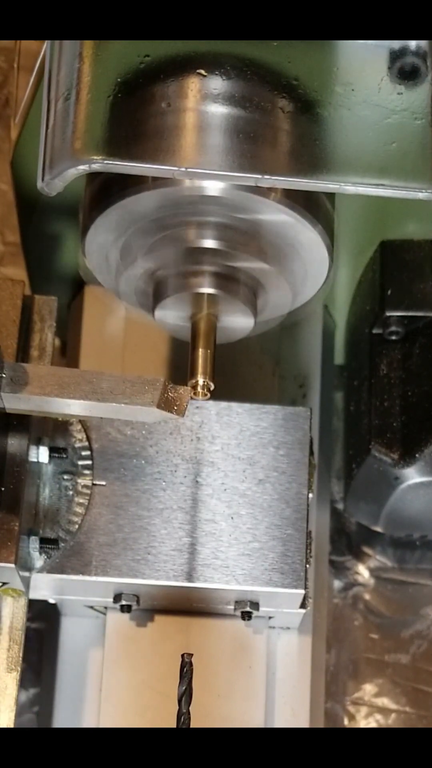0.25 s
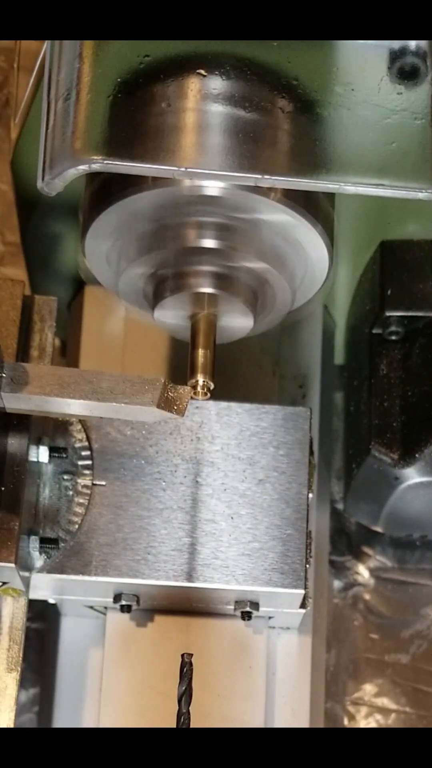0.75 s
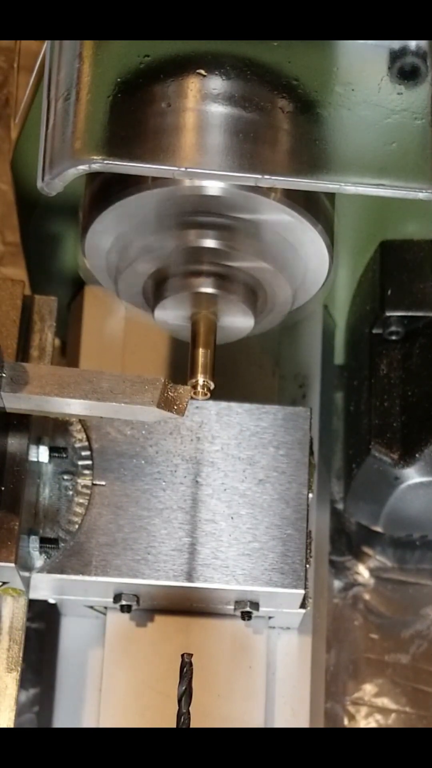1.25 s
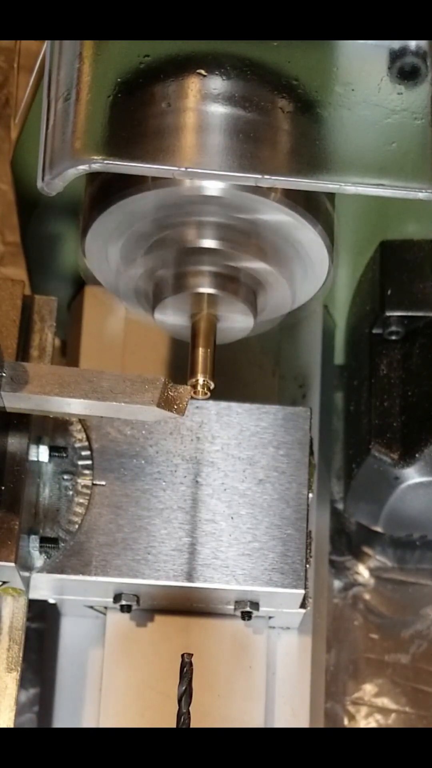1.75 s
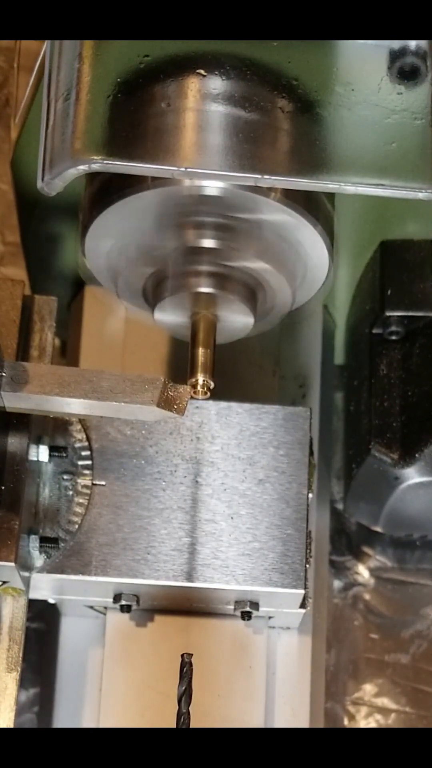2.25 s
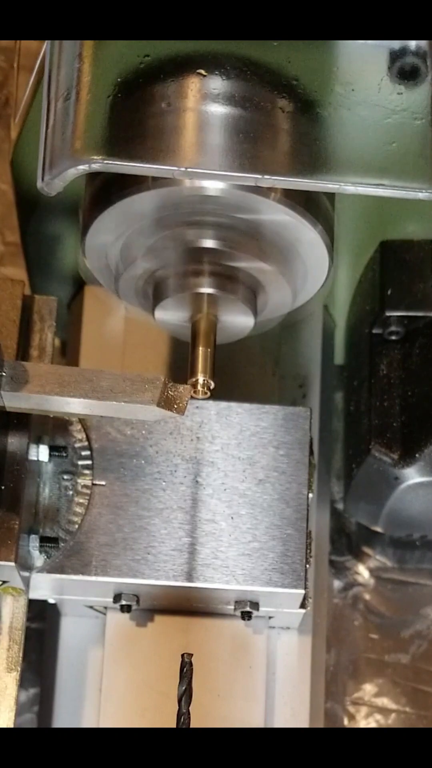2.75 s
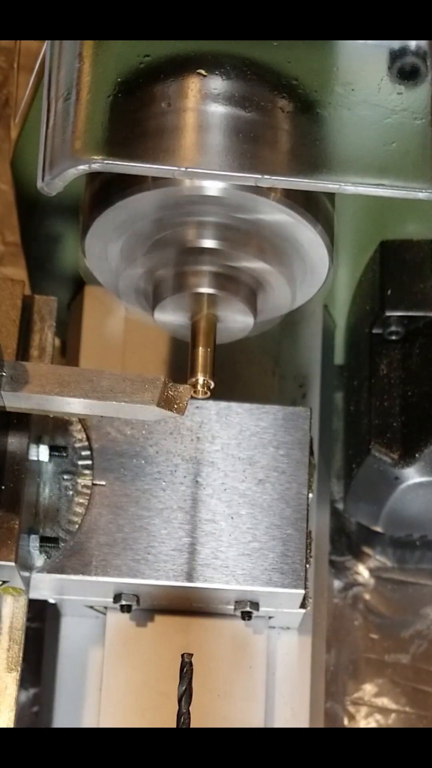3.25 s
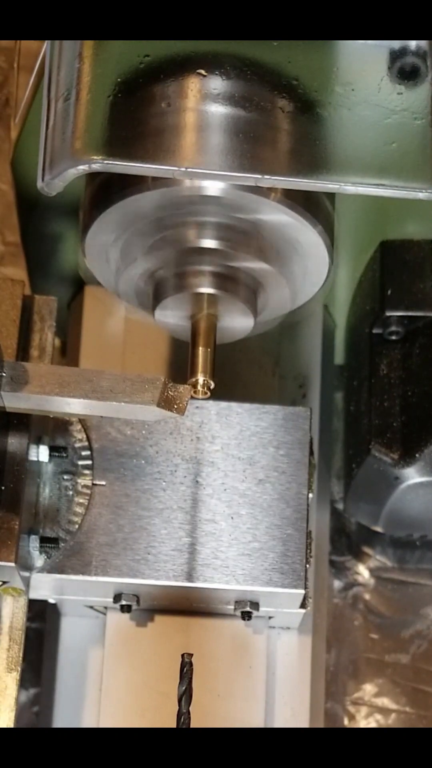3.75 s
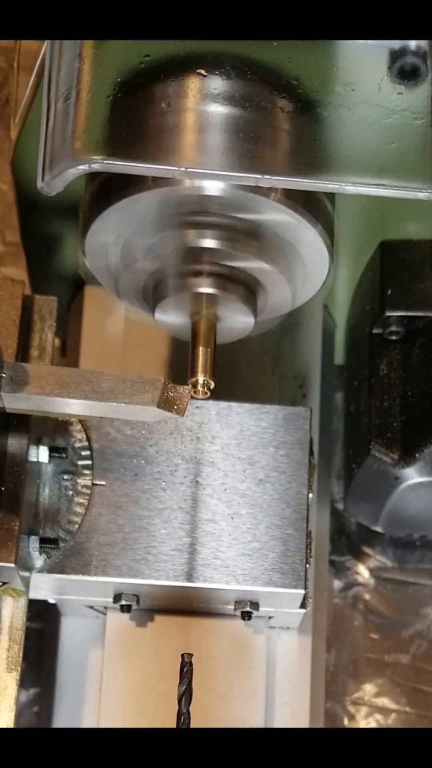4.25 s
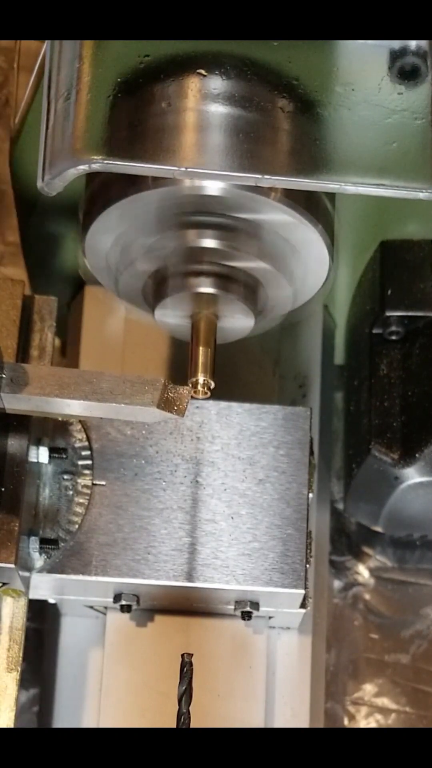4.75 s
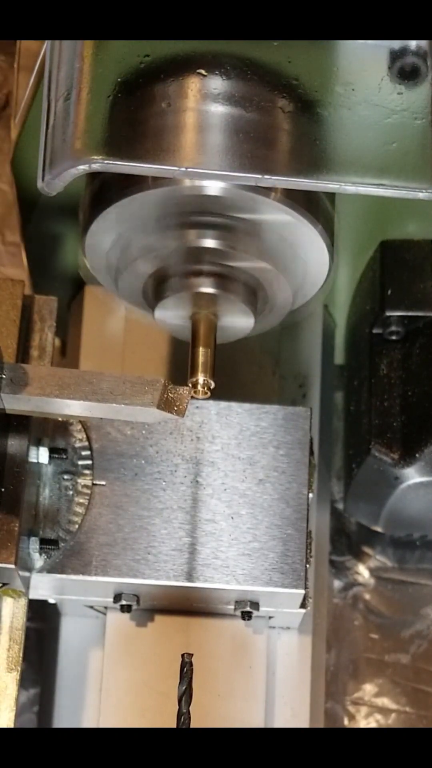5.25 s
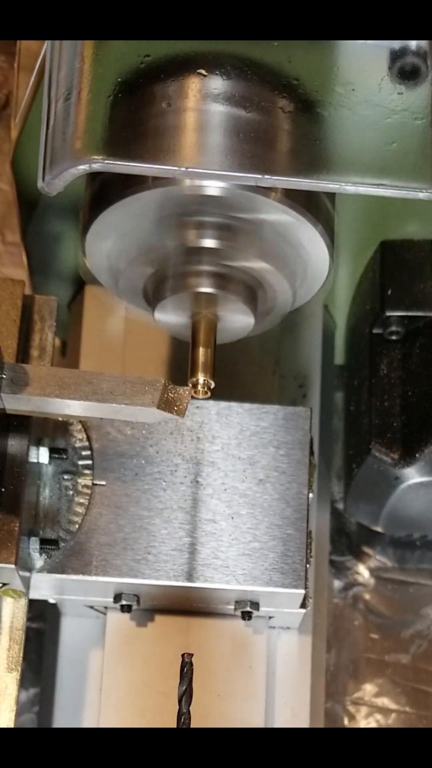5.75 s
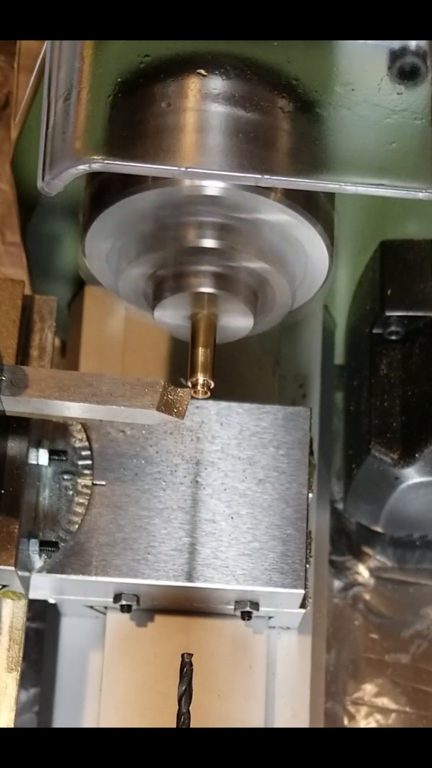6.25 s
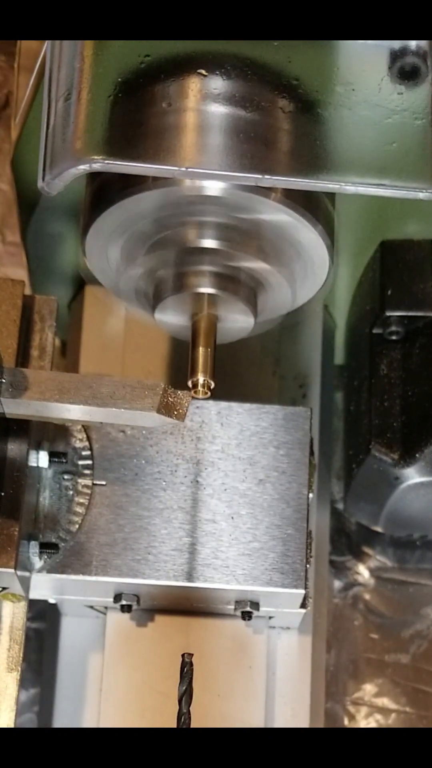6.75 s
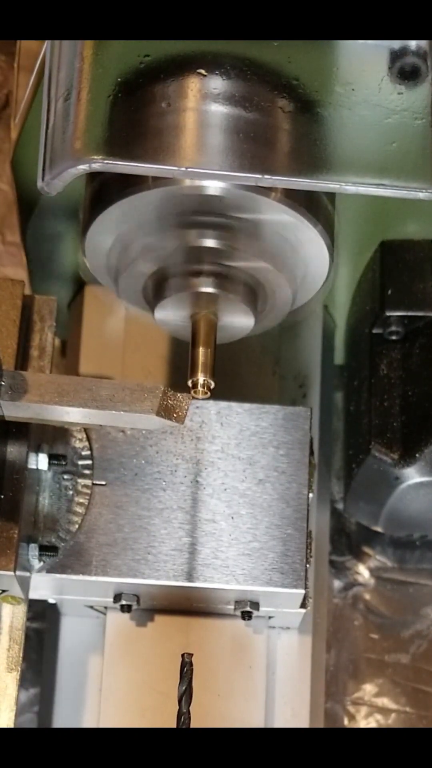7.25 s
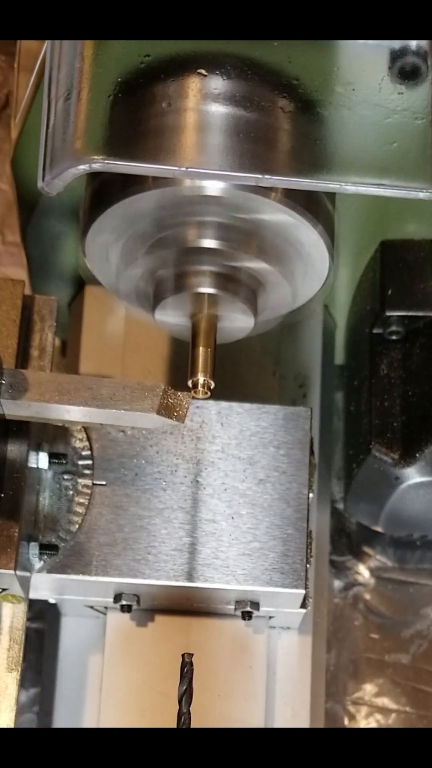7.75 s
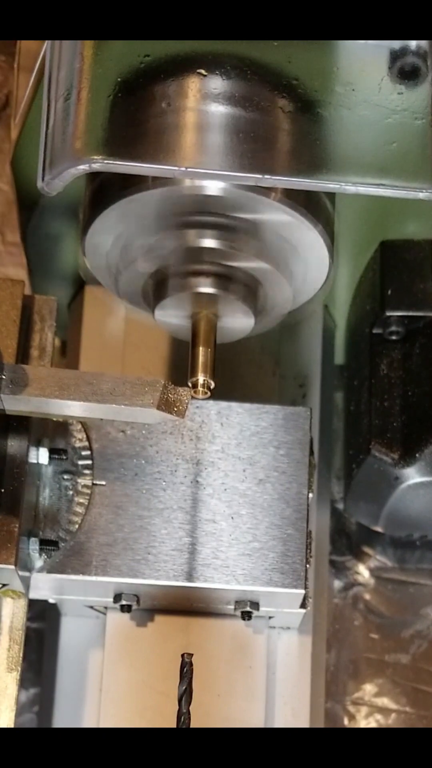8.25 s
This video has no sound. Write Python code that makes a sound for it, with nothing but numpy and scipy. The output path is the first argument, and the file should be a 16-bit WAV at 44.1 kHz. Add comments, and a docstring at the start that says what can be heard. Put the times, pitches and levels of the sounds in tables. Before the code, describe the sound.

A small lathe whines steadily while its tool cuts a thin brass rod in quick, uneven, high squeaks that gradually thin out.

```python
"""A thin brass rod squeaks in quick, uneven chirps over the whine of a small lathe. Where the tool grabs,
the rod chatters on a low mode that hands over to a higher one. The drive whines on its tooth rate over
a rough mains hum and the roar and hiss of bearings; the cut rasps once a turn and shakes the bed.
Later the squeaks thin out, chips tear off, and the tool backs off for about a second.
Heard close by two microphones a few centimetres apart."""
import sys
import numpy as np
from scipy import signal
from scipy.fft import rfft, irfft, next_fast_len
from scipy.io import wavfile
from scipy.ndimage import uniform_filter1d

SR = 44100
rng = np.random.default_rng(int(sys.argv[2]) if len(sys.argv) > 2 else 0)


def to_wav(s):
    """Save 16-bit WAV."""
    ch = np.atleast_2d(s).T  # columns
    pcm = np.round(np.clip(ch, -1, 1) * 32767)  # PCM
    wavfile.write(sys.argv[1], SR, pcm.astype(np.int16))


N = 374838
TIME_S = np.arange(N) / SR
FFT_SIZE = next_fast_len(N)
BIN_HZ = np.maximum(np.arange(FFT_SIZE // 2 + 1) * SR / FFT_SIZE, 1)
TEETH_PER_SHAFT_TURN, TEETH_PER_SPINDLE_TURN = 22, 50
RIGHT_LAG_SAMPLES = 8.14   # the right microphone is farther away


def amp(db):
    return 10 ** (np.asarray(db) / 20)


def unit_rms(x):
    return x / np.sqrt(np.mean(x ** 2) + 1e-20)


def time_curves(rows):
    """One curve for each column after the first, which is time in seconds."""
    times_s, *columns = np.transpose(rows)
    return [np.interp(TIME_S, times_s, column) for column in columns]


def bin_curve(rows):
    """(Hz, value) rows interpolated over the FFT bins in log frequency."""
    hz, values = np.transpose(rows)
    return np.interp(np.log(BIN_HZ), np.log(hz), values)


def drift(rate_hz):
    """Slow random curve of spread 1."""
    pole = np.exp(-40 * np.pi * rate_hz / SR)
    slow = signal.lfilter([1], [1, -2 * pole, pole * pole], rng.standard_normal(N // 20 + 4002))[4000:]
    return np.interp(np.arange(N) / 20, np.arange(len(slow)), unit_rms(slow - slow.mean()))


def resonate(x, modes):
    """Parallel resonances (Hz, width Hz, gain dB), signs alternating."""
    out = 0
    for k, (hz, width_hz, db) in enumerate(modes):
        r = np.exp(-np.pi * width_hz / SR)
        b = (1 - r * r) / 2 * np.array([1, 0, -1])
        a = [1, -2 * r * np.cos(2 * np.pi * hz / SR), r * r]
        out = out + (-1) ** k * amp(db) * signal.lfilter(b, a, x)
    return out


def resonate_twice(x, modes):
    return resonate(resonate(x, modes), modes)


def mix_in(out, at, piece):
    start, end = max(at, 0), min(at + piece.shape[-1], N)
    out[:, start:end] += piece[:, start - at:end - at]


def microphone_pair(mid, side):
    """Two noises become a partly coherent stereo pair, right late; its mono mean has rms 1."""
    # Each row: frequency in Hz, left-right coherence 0-1.
    coherence = [(25, 0.5), (60, 1), (250, 0.95), (600, 0.78), (1300, 0.4), (1700, 0.74), (2300, 0.55),
                 (3000, 0.16), (4100, 0.76), (5000, 0.35), (6500, 0.57), (10500, 0.2), (15000, 0.2)]
    # Each row: frequency in Hz, left over right in dB.
    balance = [(60, 7.5), (130, -3), (290, 8), (640, 2), (1410, 2.5), (3100, 1), (6820, -0.5), (15000, -2)]
    # Each row: frequency in Hz, extra phase on the right in rad.
    right_phase = [(1000, 0), (1400, .7), (1700, 0.7), (2100, -1.5), (2400, 0.24), (2800, -2.5), (3200, -2),
                   (3800, -0.37), (4100, 0), (5000, 0), (5900, 3.5), (7100, 3.8), (8000, 3), (11400, 3.5),
                   (15000, 6)]
    alike = bin_curve(coherence)
    common = np.sqrt(1 + alike) * rfft(mid, FFT_SIZE)
    apart = np.sqrt(1 - alike) * rfft(side, FFT_SIZE)
    tilt = amp(bin_curve(balance) / 2)
    delay = np.exp(-2j * np.pi * BIN_HZ * RIGHT_LAG_SAMPLES / SR + 1j * bin_curve(right_phase))
    pair = irfft(np.array([(common + apart) * tilt, (common - apart) / tilt * delay]), FFT_SIZE)[:, :N]
    return pair / np.sqrt(np.mean(pair.mean(axis=0) ** 2))


def drive_whine(tooth_rad, tooth_hz, swell_db, unevenness, lifted):
    """Tooth-rate harmonics; uneven teeth blur them, run-out adds sidebands at the shaft rate."""
    # Multiples of the tooth rate, one for each row of harmonics.
    multiples = [1, 2, 3, 4, 5, 7, 8, 9, 10, 11, 12, 13]
    # Each row: base level in dB, share of the swell, dB per Hz of tooth rate, left over right in dB,
    # left lead in rad, run-out depth, blur per unit of unevenness.
    harmonics = [(-39.5, 0.72, 0.13, 5.5, 0.5, 0.14, 0.02), (-54.5, 1.8, 0.82, 5, 2, 0.33, 0.1),
                 (-48.5, 1.07, 0.18, -2.5, 1.16, 0.37, 0.16), (-51.5, 0.33, 0.02, 2.5, -1.5, 0.12, 0.13),
                 (-52.5, 0.29, 0.17, -21, 3, 0.29, 0.12), (-57.5, 0.49, 0.09, 0, 2.5, 0.21, 1),
                 (-60, 0.17, 0.08, -2, 7, 0.12, 0.37), (-56.5, 0.26, 0.2, 13, 1, 0.24, 0.5),
                 (-49, 0.095, -0.04, -5, -0.8, 0.09, 0.27), (-55.5, 0.42, 0.22, 9, 2, .3, .6),
                 (-65, 0.6, -0.3, -2, 15, .3, .9), (-54, 0.2, 0.4, 0, 5.5, .3, .8)]
    # Rectifier ripple side tones. Each row: offset in Hz, level against the fundamental in dB.
    side_tones = [(120.5, -19), (241, -19), (-241, -29.5)]
    # Second harmonic. Each row: time in seconds, gain in dB.
    octave_gain = [(0, -4), (3, -4), (3.6, 4), (4.4, -5), (5, 0.5), (5.7, -2.5), (6.2, 1.5), (6.7, 2.5),
                   (7.6, -2.5), (8.5, 2.5)]
    steady_hz, firmness = 1110, 0.58
    octave_db, = time_curves(octave_gain)
    shaft_rad = tooth_rad / TEETH_PER_SHAFT_TURN
    wander_rad = 0.014 * unevenness * drift(11.6) + 0.29 * drift(7.2)
    ripple = 1 + sum(amp(db) * np.exp(2j * np.pi * hz * TIME_S + 0.74j * drift(14))
                     for hz, db in side_tones)
    out = np.zeros((2, N))
    for k, (db, share, db_per_hz, pan_db, lead_rad, runout, blur) in zip(multiples, harmonics):
        blur = np.clip(blur * unevenness + 0.039 * (k - 1), 0, 0.95)
        runout = runout * (1 + 0.41 * lifted)
        shared, own = [(drift(22 + 10 * k) + 1j * drift(22 + 4.6 * k)) / np.sqrt(2) for _ in range(2)]
        tone = np.sqrt(1 - blur ** 2) + blur * np.array([shared, 0.83 * shared + 0.72 * own])
        tone /= (np.abs(tone) + 0.099) ** firmness   # evens the level, keeps the phase jitter
        wobble_rad = 0.81 * runout * np.sin(shaft_rad + k + 1.4 * (k - 1))
        tone *= np.exp(1j * (k * tooth_rad + np.sqrt(k) * wander_rad + wobble_rad))
        if k == 1:
            tone *= ripple
        level_db = db + share * swell_db + db_per_hz * (tooth_hz - steady_hz)
        level_db += (k > 1) * drift(4.8) + (k == 2) * octave_db
        envelope = np.sqrt(2) * amp(level_db) * (1 + runout * np.cos(shaft_rad + k))
        left = amp(pan_db / 2) * np.exp(0.5j * lead_rad)
        sides = np.array([[left], [1 / left]])
        out += envelope / max(abs(sides.mean()), 0.5) * np.real(tone * sides)
    return out


def mains_hum():
    """Rectifier pulses shake the motor; at random the lowest tone skips: it dips and loses phase."""
    # Each row: frequency in Hz, relative level in dB.
    tones = [(120, 0), (241, -6), (359, -13.5), (484, -16.5), (1332, -14.5)]
    # Each row: time in seconds, mean skips per second.
    skip_rates = [(0, 8), (2.3, 7), (2.45, 1), (2.9, 1), (3.1, 8), (3.5, 3), (3.6, .3), (4.05, .3),
                  (4.2, 9), (4.9, 16), (5.0, .3), (5.4, .3), (5.8, 11), (6.3, 6), (7, 17), (7.9, 19),
                  (8.5, 10)]
    skip_turns = 0.46
    skips = rng.random(N) < time_curves(skip_rates)[0] / SR
    skipping = np.exp(-2j * np.pi * skip_turns * np.cumsum(skips))
    skipping = signal.oaconvolve(skipping, np.hanning(900) / 450, "same")
    skipping /= (np.abs(skipping) + 0.046) ** 0.47
    out = 0
    for k, (hz, db) in enumerate(tones):
        waver = skipping if k == 0 else np.exp(0.68j * drift(20))
        envelope = amp(db + (0.4 + 0.9 * k) * drift(14))
        out = out + envelope * np.real(waver * np.exp(2j * np.pi * hz * TIME_S))
    return unit_rms(out)


def shaft_noise(tooth_rad, spectrum, locked_share, flicker_db):
    """Shaped noise; a share repeats with every shaft turn and forms a comb of lines."""
    steps = 880
    pattern = rng.standard_normal((2, steps))
    pattern -= uniform_filter1d(pattern, size=60, mode="wrap")   # the lowest orders do not radiate
    turns = tooth_rad / TEETH_PER_SHAFT_TURN / (2 * np.pi) + 0.0014 * drift(4.6)
    locked = pattern[:, (turns % 1 * steps).astype(int) % steps]
    noise = np.sqrt(1 - locked_share) * rng.standard_normal((2, N)) + np.sqrt(locked_share) * locked
    noise *= amp(flicker_db * (drift(53) + 0.081 * drift(4.6)))
    shaped = irfft(rfft(noise, FFT_SIZE) * amp(bin_curve(spectrum)), FFT_SIZE)[:, :N]
    return microphone_pair(*shaped)


def bearings(tooth_rad, swell_db, uneven_db):
    """Bearings and fan roar and hiss, swelling with the overall level."""
    # Each row of both spectra: frequency in Hz, relative density in dB.
    roar_spectrum = [(15, -26), (40, -21), (75, -23.5), (120, -10.5), (180, -22.5), (260, -17.5),
                     (340, -25), (430, -24), (520, -18.5), (630, -21.5), (720, -21.5), (900, -20),
                     (1050, -19.5), (1200, -17.5), (1325, -11.5), (1420, -15.5), (1550, -16.5), (1700, -25),
                     (2050, -17), (2350, -14.5), (2650, -18.5), (3000, -23), (3350, -20), (3700, -22),
                     (4300, -26.5), (5400, -18.5), (6200, -24.5), (8000, -72)]
    hiss_spectrum = [(4500, -16.5), (6000, -8), (6900, -1), (7500, -13.5), (8300, -37), (8900, -16.5),
                     (9500, -19), (10300, -7.5), (11000, 2), (11700, -7), (12500, -5), (13000, -12),
                     (13400, -8), (13800, -13), (14150, -3), (14550, -4.5), (15200, -8), (15700, -5.5),
                     (16500, -3)]
    # Low band of the roar. Each row: time in seconds, gain in dB.
    band_gain = [(0, 0.5), (1, -3.5), (1.8, 1), (2.7, -3.5), (3.4, -0.5), (3.9, 0), (5, 0.5), (6, 3),
                 (6.6, 0), (7.2, -0.5), (8.5, -2)]
    roar = shaft_noise(tooth_rad, roar_spectrum, 0.36 / amp(0.5 * np.abs(uneven_db)), flicker_db=1.3)
    roar *= amp(-42 + 0.39 * swell_db)
    band = signal.sosfilt(signal.butter(2, (380, 750), "band", fs=SR, output="sos"), roar)
    roar += (amp(time_curves(band_gain)[0]) - 1) * band
    hiss = shaft_noise(tooth_rad, hiss_spectrum, locked_share=0.43, flicker_db=1.5)
    return roar + amp(-40.5 + 0.57 * swell_db) * hiss


def cutting_rasp(tooth_rad, tool_db, rod_db):
    """Tearing clicks ring tool and rod; the rod runs out of true, so the bite peaks once a turn."""
    # Each row of both: mode frequency in Hz, width in Hz, gain per pass in dB.
    tool_modes = [(2468, 280, -3), (2720, 232, -2), (2936, 160, -0.5), (3300, 193, -5), (3980, 340, -2.5)]
    rod_modes = [(4170, 360, 4.5), (4730, 69, 8.5), (5300, 2500, -5.5)]
    clicks_per_s = 2500
    spindle_rad = tooth_rad / TEETH_PER_SPINDLE_TURN + 0.8 * drift(3)
    bite = amp(1.5 * (np.cos(spindle_rad) + 0.5 * np.cos(3 * spindle_rad) + 1.64 * drift(36)))
    out = 0
    for modes, level_db in ((tool_modes, tool_db), (rod_modes, rod_db)):
        clicks = (rng.random((2, N)) < clicks_per_s / SR) * rng.standard_normal((2, N))
        clicks *= amp(1.5 * np.minimum(rng.exponential(1, (2, N)), 4))
        out = out + amp(level_db) * microphone_pair(*resonate_twice(clicks * bite, modes))
    return out


def bed_rumble(swell_db):
    """Cutting force shakes the lathe bed; its upper modes sink as the overall level rises."""
    # Each row: mode frequency in Hz, width in Hz, gain per pass in dB.
    bed_modes = [(727.8, 32, 1), (765, 32, 0), (797, 59, -0.5), (838.7, 45, 0)]
    force = rng.standard_normal((2, N))
    lower = resonate_twice(force, bed_modes[:2])
    upper = resonate_twice(force, bed_modes[2:])
    return microphone_pair(*(lower - amp(0.5 - 0.47 * swell_db) * upper))


def rod_squeaks():
    """Chatter grows on the low mode, breaks off and slides to the high one; contact adds harmonics."""
    # Each row: break-off in seconds, low mode level in dB, its base pitch in Hz,
    # high mode level in dB, its hold in ms.
    squeaks = [(0.0038, -14.5, 4140, -20, 7.9), (0.0222, -19.5, 4200, -19.5, 5.8),
               (0.0528, -15, 4120, -18, 4.6), (0.0833, -24, 4170, -33.5, 6.6),
               (0.1013, -15, 4120, -17.5, 4.9), (0.1467, -31, 4200, -29, 5.0),
               (0.1645, -28, 4200, -29.9, 6.2), (0.196, -14.5, 4150, -17, 5),
               (0.2428, -22.5, 4200, -29, 5.3), (0.289, -20.5, 4150, -24, 4.6),
               (0.3292, -33, 4170.0, -45, 5.4), (0.349, -18, 4130, -18.5, 5), (0.3602, -29, 4100, -42, 4.3),
               (0.3697, -21, 4070, -21, 4.1), (0.382, -26, 4120, -41, 5.5), (0.401, -14, 4120, -16, 3.5),
               (0.412, -25, 4230, -32, 4.7), (0.4212, -15.5, 4130, -16.5, 4.1),
               (0.452, -17, 4170.0, -21.8, 4.0), (0.4978, -15, 4100, -13, 2.6),
               (0.5285, -28.3, 4230.0, -31.5, 5.7), (0.544, -25, 4160, -22.5, 6.4),
               (0.577, -15.5, 4130, -23, 6.8), (0.592, -13.5, 4170, -16, 4.6),
               (0.622, -27.5, 4170, -37, 5.0), (0.6374, -30, 4180, -40, 5.0), (0.649, -27, 4270, -27, 7.9),
               (0.68, -31, 4170.0, -35, 5.5), (0.6983, -25, 4190.0, -27, 7.8),
               (0.7495, -29, 4240.0, -28, 8), (0.7805, -28, 4270, -33, 7.3),
               (0.797, -14.5, 4150.0, -17, 4.9), (0.827, -23, 4260, -26, 6.0),
               (0.8387, -27, 4230.0, -29.5, 6.9), (0.859, -30, 4140, -29, 6.4),
               (0.89, -14, 4090, -17.5, 5.9), (0.923, -13.5, 4130, -24, 6.5), (0.936, -19, 4100, -28, 7),
               (0.957, -15, 4080, -15.5, 4.2), (0.988, -23, 4220, -32, 5.3), (1.033, -22, 4190.0, -34, 4.6),
               (1.124, -14.5, 4100, -20, 4.1), (1.1841, -23, 4170.0, -36, 4.8),
               (1.2398, -33, 4130, -47, 4.6), (1.279, -23, 4180, -31.1, 3.9), (1.298, -23, 4070, -28, 8.9),
               (1.33, -17.5, 4170.0, -27.0, 3.3), (1.352, -14, 4190, -15.5, 5.6),
               (1.3829, -22.8, 4130, -40.4, 5.0), (1.3967, -14, 4130, -18, 6.4),
               (1.429, -12.5, 4110.0, -20, 5.4), (1.4706, -12.5, 4140, -23, 6.8),
               (1.486, -17, 4100, -19.5, 6.4), (1.5066, -24, 4120.0, -25, 6.5),
               (1.5171, -31, 4110.0, -38, 4.6), (1.555, -19, 4080, -16.5, 4.7),
               (1.587, -19, 4200, -18.5, 5.9), (1.6094, -29.1, 4110.0, -36, 5.0),
               (1.635, -12, 4110, -19.5, 5.5), (1.657, -24, 4070, -24, 5.1), (1.6663, -13.5, 4100, -25, 3),
               (1.6786, -15.5, 4140, -17.5, 5.3), (1.767, -15.5, 4140.0, -19.5, 6.1),
               (1.7991, -28, 4200, -41.7, 4.8), (1.844, -27, 4260, -35, 4.6),
               (1.9024, -25.5, 4140, -31, 8.9), (1.939, -34, 4270, -40, 5), (1.980, -34, 4180, -40, 5),
               (2.030, -30, 4170, -43, 5), (2.044, -34, 4240, -45, 4.5), (2.185, -30, 4270, -40, 4.3),
               (2.2094, -27.5, 4260, -35, 4.5), (2.24, -21.6, 4240, -26, 3.6),
               (2.2771, -23.5, 4200, -25.5, 7.7), (2.3089, -23, 4140, -27, 5.8),
               (2.3189, -12.5, 4120, -18, 4.9), (2.3659, -14.5, 4110, -25, 4.7),
               (2.4206, -18.5, 4200, -28, 4.5), (2.442, -13, 4120, -18.5, 5.3),
               (2.474, -12, 4090, -19.5, 4.1), (2.533, -33, 4280, -44, 4), (2.5865, -31, 4080, -38, 3.7),
               (2.619, -34, 4050, -38, 5), (2.655, -36, 4000, -48, 4), (2.7266, -29, 4140, -37, 3.8),
               (2.7705, -35, 4100, -40, 4), (2.794, -33, 4210, -43, 4.3), (2.8375, -30, 4250, -42, 4),
               (2.874, -32, 4260, -45, 4), (2.978, -35, 4140, -39, 4), (3.033, -34, 4150, -36, 6),
               (3.08, -29, 4170, -42, 4), (3.0639, -32, 4230, -42, 3.9), (3.1176, -27, 4270, -39, 3.8),
               (3.231, -27.5, 4160, -32, 4.3), (3.2618, -22, 4220, -31, 3.0), (3.2985, -33, 4210, -37, 4.4),
               (3.3138, -29, 4220, -37.5, 4.4), (3.407, -39, 4200, -44, 3.4),
               (4.011, -28.8, 4000, -44, 5.0), (4.3956, -29, 4100, -42, 5.0),
               (4.4945, -22.5, 4060, -39.5, 4), (4.683, -36, 4100, -47, 4), (4.726, -38, 3920, -46, 4),
               (5.007, -33, 4150, -45, 4), (5.022, -36, 4100, -46, 4), (5.2667, -30, 4180, -39.4, 5.9),
               (5.435, -34, 4000, -46, 4.4), (5.487, -33, 3890, -47, 4.2), (5.5857, -33, 4230, -44, 4),
               (5.63, -33, 4070, -44, 4), (5.702, -36, 3957, -41, 3.9), (5.7643, -34, 4000, -46, 4),
               (5.813, -33, 4160, -43, 4.1), (5.909, -36, 4005, -52, 4), (5.939, -30, 4100, -43.7, 4.9),
               (5.9611, -33, 4030.0, -43, 4.6), (6.1016, -29, 3850, -45.7, 4.9),
               (6.142, -22, 3900, -41, 4.1), (6.2966, -28, 4130, -39, 5.0), (6.347, -28.5, 4040, -34, 4.6),
               (6.395, -24, 4030, -42.9, 4.1), (6.521, -24.5, 4100, -31, 5), (6.565, -29, 4220, -34, 5.1),
               (7.999, -28, 3921, -43, 4.8), (8.267, -27, 3880, -44.0, 6.6),
               (8.3099, -32, 4170.0, -43.6, 4.4), (8.403, -30, 4120, -46, 6)]
    # Friction noise at the break-off. Each row: centre in Hz, width in Hz, gain in dB.
    friction_bands = [(7600, 3300, 6), (13600, 3500, -0.5)]
    offsets = np.arange(-400, 600)
    ms = offsets / SR * 1000
    lead_rad = np.array([[-0.65], [0.65]])
    friction = unit_rms(resonate(rng.standard_normal(N), friction_bands))
    out = np.zeros((2, N))
    for (at_s, low_db, low_hz, high_db, hold_ms), chance in zip(squeaks, rng.random((len(squeaks), 4))):
        climb_hz = 61 * min(at_s / 2.1, 1)   # rises as the tool feeds in, then stays
        high_hz = 4563 + 24.3 * hold_ms + climb_hz + 18 * (2 * chance[3] - 1)
        gap_hz = high_hz - low_hz
        growth = 0.96 * np.exp(-(ms / 2) ** 2) + 0.38 * np.exp(ms / 4.1)
        low_env = np.where(ms < 0, growth, np.exp(-(ms / 0.93) ** 2))
        high_env = np.clip(ms - 1.2, 0, 1) / (1 + np.exp((ms - 1.6 - hold_ms) / 1.2))
        high_env *= 1 + 0.1 * np.sin(1.9 * ms + 6 * chance[0])
        # The low mode sets in high, falls into its peak and bends up as it breaks off.
        fall_hz = gap_hz / (1 + np.exp((ms + 3.68 + 2.77 * chance[0]) / 0.4))
        bend_hz = 0.32 * gap_hz / (1 + np.exp((1.3 - ms) / 0.29))
        low_turns = np.cumsum(low_hz + fall_hz + bend_hz) / SR + 0.0094 * ms * np.abs(ms) + chance[1]
        high_turns = high_hz * ms / 1000 + 0.68 * np.exp(-np.maximum(ms - 0.8, 0) / 8.9) + chance[2]
        low, high = amp(low_db) * low_env, amp(high_db) * high_env
        squeak = np.zeros((2, len(ms)))
        for envelope, turns, pan_db in ((low, low_turns, 9), (high, high_turns, -4)):
            sides = amp([[pan_db / 2], [-pan_db / 2]])
            sides /= abs(np.mean(sides * np.exp(1j * lead_rad)))
            squeak += envelope * sides * np.cos(2 * np.pi * turns + lead_rad)
        slide_rad = 2 * np.pi * np.cumsum(low_hz + gap_hz / (1 + np.exp((1.5 - ms) / 0.99))) / SR
        contact = uniform_filter1d(0.61 * low + high, size=110) ** 2
        squeak += contact * amp(0.5) * np.cos(2 * slide_rad + 1.02 * lead_rad)
        squeak += contact * np.cos(3 * slide_rad - 1.2 * lead_rad)
        samples = round(at_s * SR) + offsets
        scrape_env = amp(2 * low_db - 10.5) * np.exp(-((ms - 1.8) / 5.1) ** 2)
        scrape = scrape_env * friction[np.clip(samples, 0, N - 1)]
        squeak += np.array([scrape, np.roll(scrape, round(RIGHT_LAG_SAMPLES))])
        mix_in(out, samples[0], squeak)
    return out


def chip_snags():
    """Chips tear off in short gritty scrapes that ring tool, rod and bed together, mostly left."""
    # Each row: start in seconds, level before panning in dB, tool mode in Hz, decay time in ms.
    snags = [(3.835, -36, 2940, 10), (4.0013, -33.5, 2810, 13), (4.4842, -30.5, 2990, 12),
             (5.3041, -36, 2940, 10.4), (5.907, -35, 2637, 35), (5.936, -32, 2720, 12),
             (5.956, -31.5, 2820, 17), (5.997, -31.5, 2870, 19), (6.097, -33, 2600, 7.9),
             (6.1406, -24, 2680, 10), (6.179, -33, 2885, 10), (6.244, -31, 2530, 15),
             (6.2872, -34, 2840, 17), (6.342, -30, 2750, 13.3), (6.3928, -30, 2620, 7.2),
             (6.51, -30, 2720, 17), (6.525, -28, 2700, 11), (6.557, -30, 3010, 8.7), (6.6, -37, 2700, 17),
             (6.6487, -35, 2860, 14), (6.695, -35, 2600, 11), (7.985, -29, 2945, 13.6),
             (7.994, -43, 2920, 11.5), (8.025, -34, 2906, 9), (8.04, -38, 2900, 10),
             (8.075, -31.5, 2920, 19), (8.089, -34, 2950, 9.1), (8.1146, -34, 2940, 22),
             (8.1594, -33.5, 2927, 20), (8.205, -31, 2924, 10), (8.222, -40, 2900, 7),
             (8.249, -30.5, 2780, 24), (8.302, -35, 3300, 15), (8.317, -31, 2546, 11),
             (8.361, -32.5, 2894, 15), (8.3984, -29, 2920, 7.7), (8.415, -37, 2790, 5.5),
             (8.437, -32, 2820, 13.2), (8.452, -40, 2850, 11)]
    ms = np.arange(2400) / SR * 1000
    grits = rng.standard_normal((len(snags), len(ms))) * rng.exponential(1, (len(snags), len(ms)))
    out = np.zeros((2, N))
    for (start_s, db, tool_hz, decay_ms), grit in zip(snags, grits):
        envelope = (1 - np.exp(-ms / (0.12 * decay_ms))) * np.exp(-(ms / decay_ms) ** 2)
        modes = [(650, 300, -12.5), (tool_hz, 400, 0.5), (3450, 700, -3),
                 (4080, 550, 0.5), (4700, 500, -21.5)]
        burst = amp(db) * np.sqrt(np.mean(envelope ** 2)) * unit_rms(resonate(grit * envelope, modes))
        pair = np.array([1.85 * burst, 0.22 * np.roll(burst, round(RIGHT_LAG_SAMPLES))])
        mix_in(out, round(start_s * SR), pair)
    return out


def with_echoes(x):
    """Faint early echoes off bed, guard and wall, two on each side."""
    out = x.copy()
    for channel, delay_ms, db in ((0, 4.3, -22), (1, 5.9, -22), (0, 9.1, -25), (1, 11.5, -25)):
        lag = round(delay_ms * SR / 1000)
        out[channel, lag:] += amp(db) * x[channel, :-lag]
    return out


def scene():
    """The drive runs throughout; the tool cuts, backs off the rod and comes in again."""
    # Each row: time in seconds, tooth rate in Hz, unevenness under load in dB,
    # swell in the overall level of whine, hum, roar and hiss in dB.
    running = [(0, 1095, 30, -8.5), (1.5, 1094, 27.5, -5.5), (2.5, 1089, 30, -5.5), (2.8, 1089, 23, -4),
               (3.3, 1097, 3, -5), (3.55, 1112, 9.5, -3.5), (4.2, 1109, 9, 0.5), (5, 1105, -41, 4),
               (5.5, 1111, 10, 2.5), (6.3, 1109, 14.5, 1.5), (6.6, 1114, 12.5, 1), (6.95, 1119, 7, -0.3),
               (7.35, 1124, 2, -1.5), (7.85, 1123, 8.5, 0), (8.08, 1115, 10, 1.5), (8.5, 1115, 16, -0.5)]
    # Each row: time in seconds, then tool rasp, rod rasp and bed rumble in dB before the lift's dip.
    cut_levels = [(0, -48, -40.5, -49), (1.1, -46, -43.5, -48), (1.5, -45.5, -36.5, -48.5),
                  (1.95, -47, -48, -48.5), (2.35, -46, -40.5, -47), (2.55, -48, -46, -45),
                  (2.95, -44.5, -46, -47.5), (3.38, -48.5, -45, -49.5), (3.5, -50.5, -55, -48),
                  (4.2, -49.5, -55, -50.5), (4.7, -43.5, -50, -41), (5.05, -44.5, -56, -48.5),
                  (5.25, -41.5, -54, -42), (5.8, -43.5, -61, -50), (5.95, -43.5, -48, -44.5),
                  (6.1, -47, -54, -52), (6.27, -40.5, -57, -43), (6.65, -44, -47, -50),
                  (7.7, -49, -48, -53.5), (8.0, -39, -47, -50), (8.2, -40.5, -42, -46.5),
                  (8.5, -41.5, -53, -52)]
    lift_s, touch_s, move_s = 6.74, 7.975, 0.05
    tooth_hz, uneven_db, swell_db = time_curves(running)
    tool_db, rod_db, bed_db = time_curves(cut_levels)
    tooth_rad = 2 * np.pi * np.cumsum(tooth_hz) / SR
    lifted = np.clip(np.minimum(TIME_S - lift_s, touch_s - TIME_S) / move_s + 0.5, 0, 1)
    since_lift = np.maximum.accumulate(lifted)
    whine = drive_whine(tooth_rad, tooth_hz, swell_db, amp(uneven_db), lifted)
    hum = amp(-44 + 0.51 * swell_db - 0.5 * since_lift) * mains_hum()
    roar = bearings(tooth_rad, swell_db, uneven_db)
    rasp = amp(-11 * lifted) * cutting_rasp(tooth_rad, tool_db, rod_db)
    rumble = amp(bed_db - 3 * lifted) * bed_rumble(swell_db)
    return whine + hum + roar + rasp + rumble + with_echoes(rod_squeaks() + chip_snags())


def record(dry):
    """A steep low-pass cuts the top treble."""
    stop_db, stop_hz = 60, 15860
    return signal.sosfilt(signal.cheby2(30, stop_db, stop_hz, fs=SR, output="sos"), dry)


dry = scene()
out = record(dry)
to_wav(out)
```